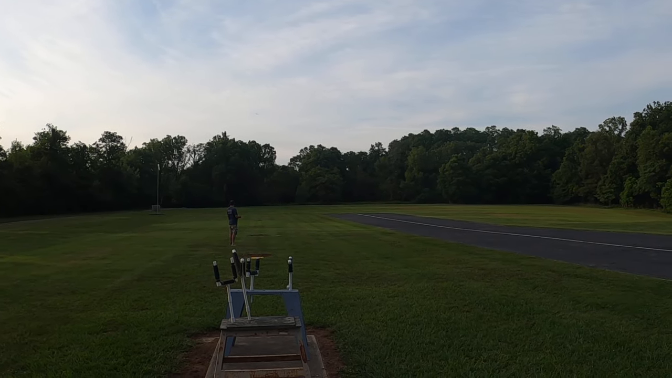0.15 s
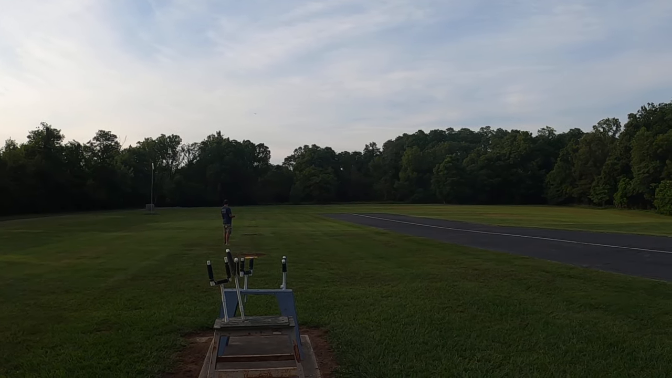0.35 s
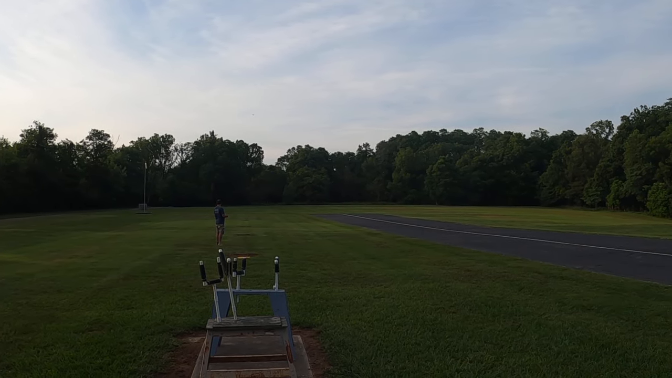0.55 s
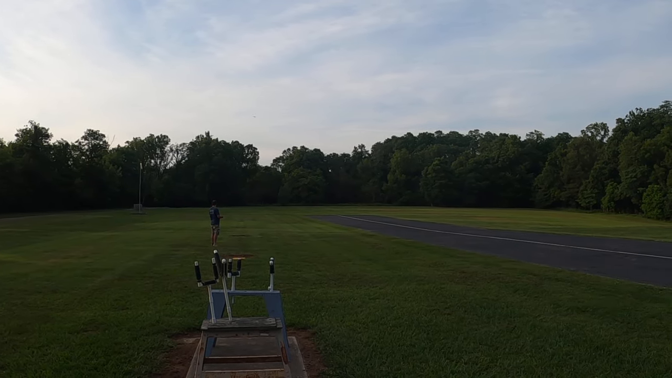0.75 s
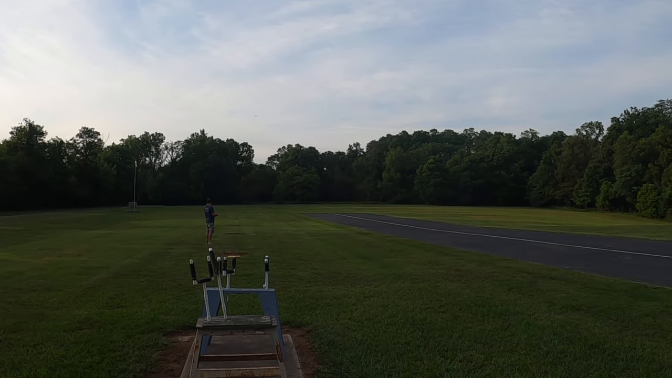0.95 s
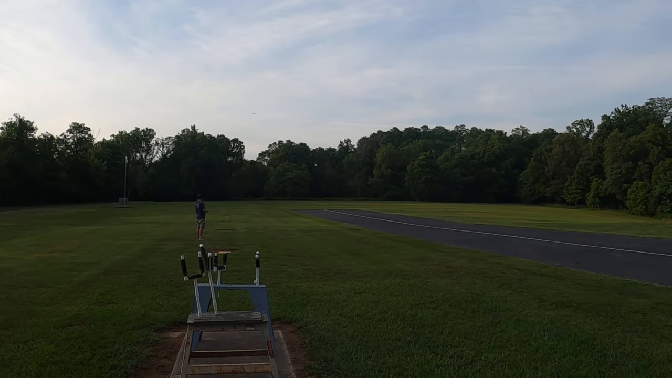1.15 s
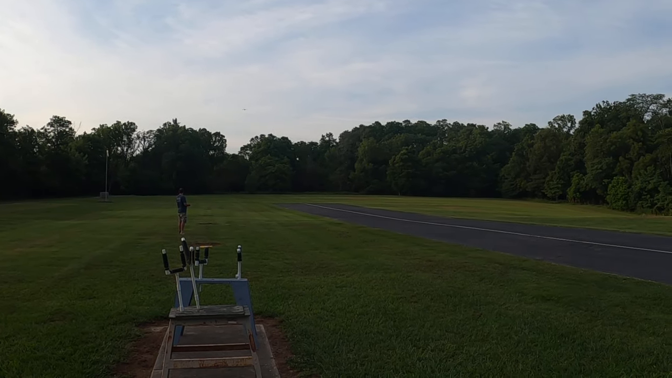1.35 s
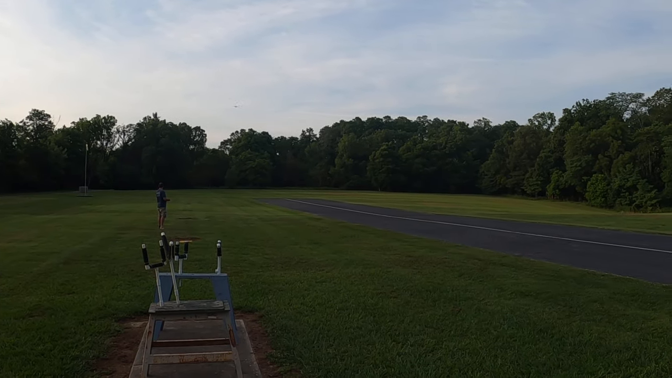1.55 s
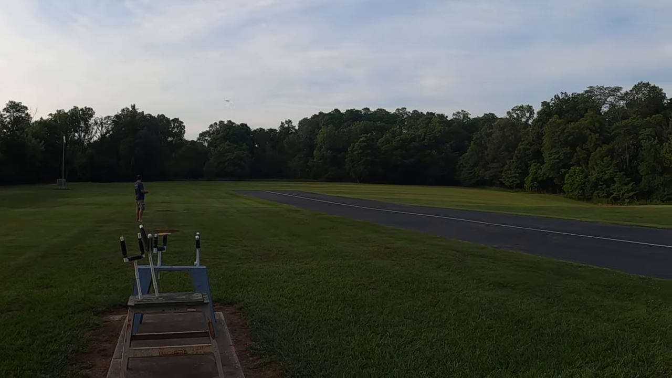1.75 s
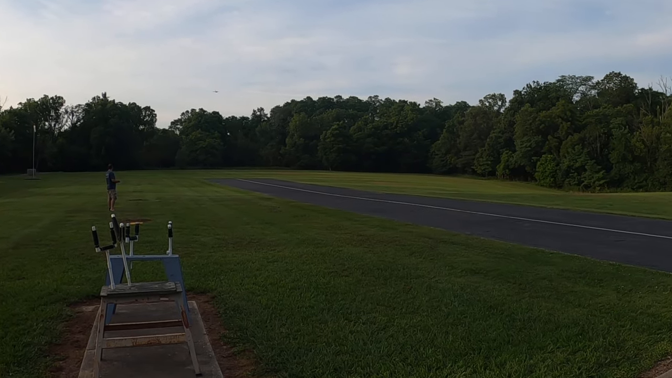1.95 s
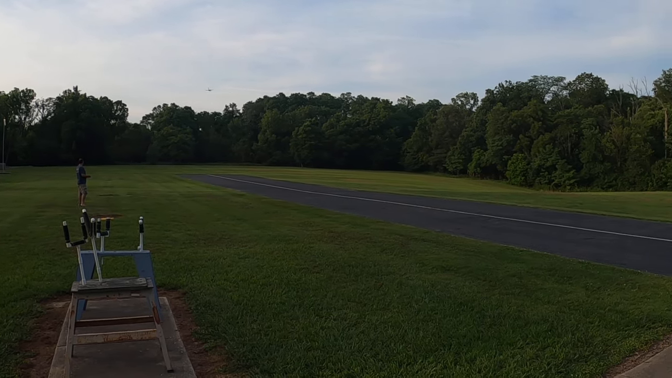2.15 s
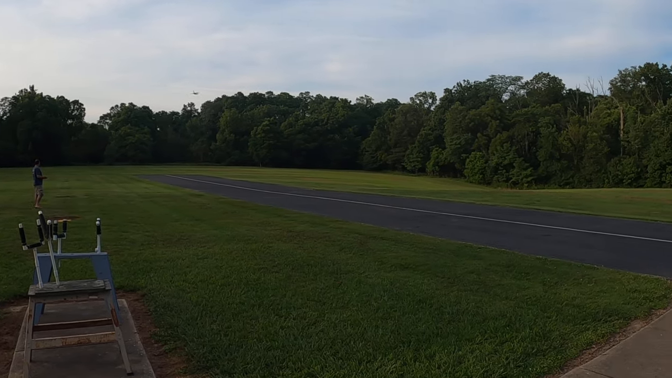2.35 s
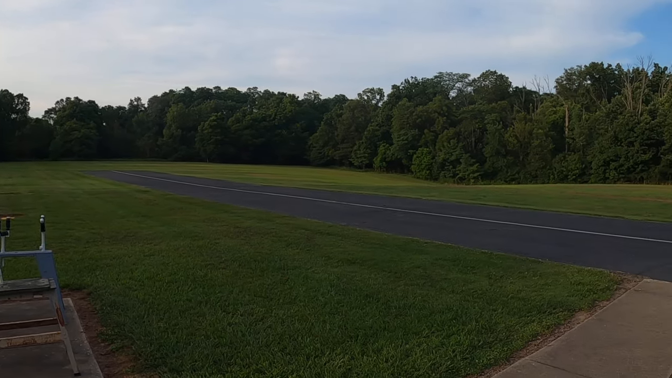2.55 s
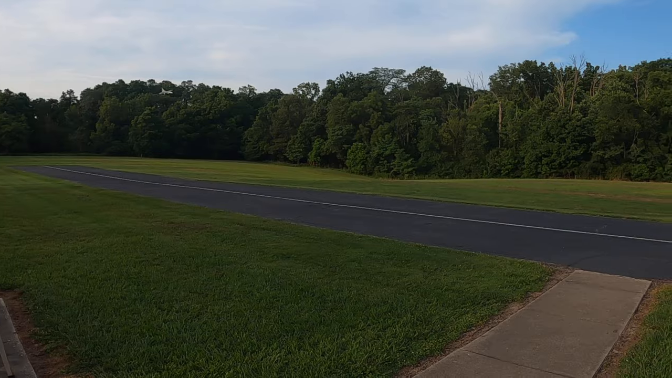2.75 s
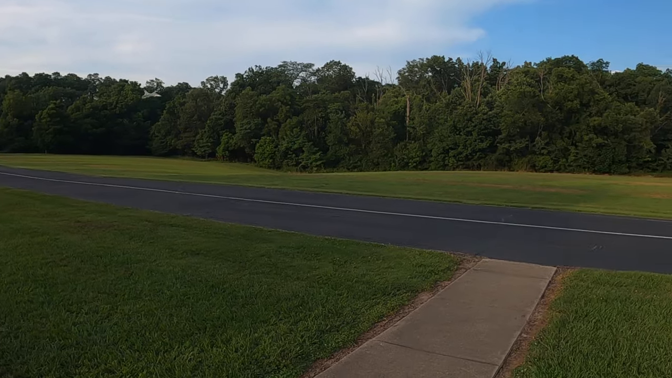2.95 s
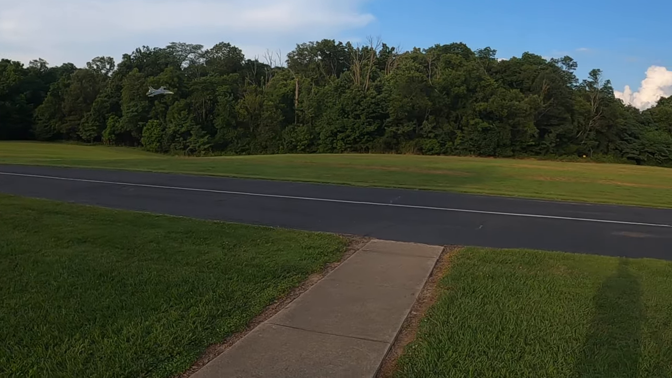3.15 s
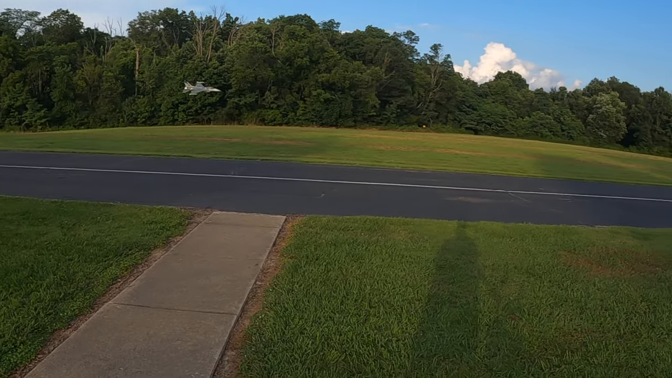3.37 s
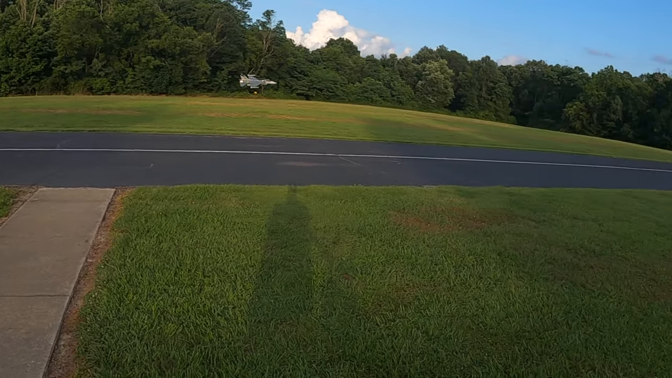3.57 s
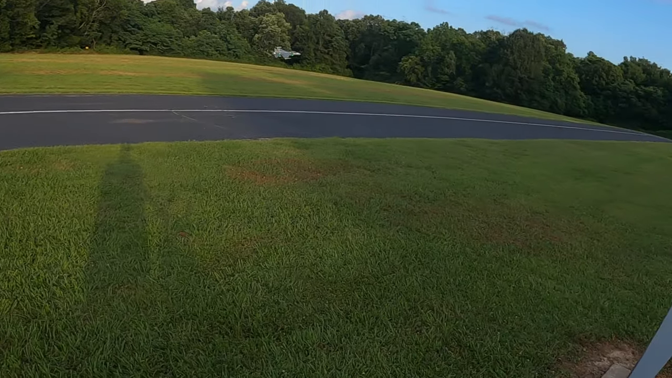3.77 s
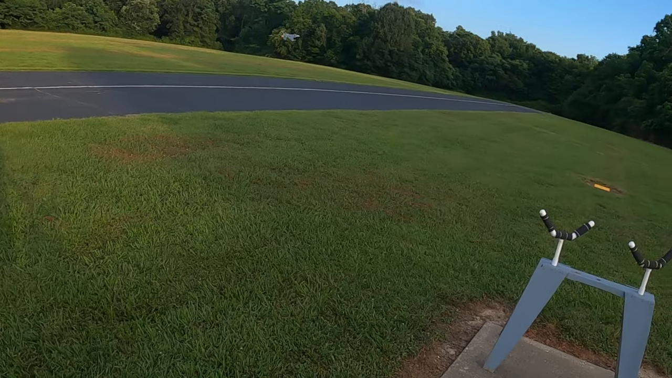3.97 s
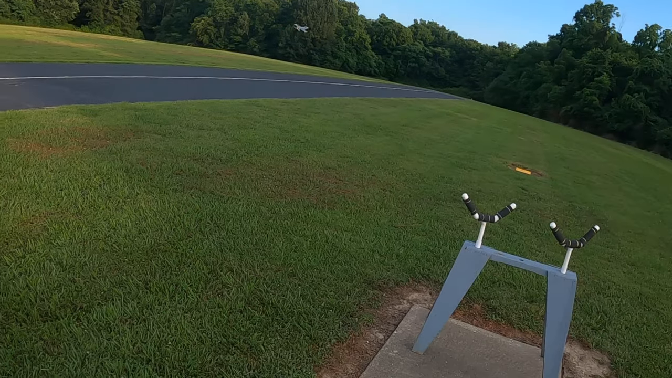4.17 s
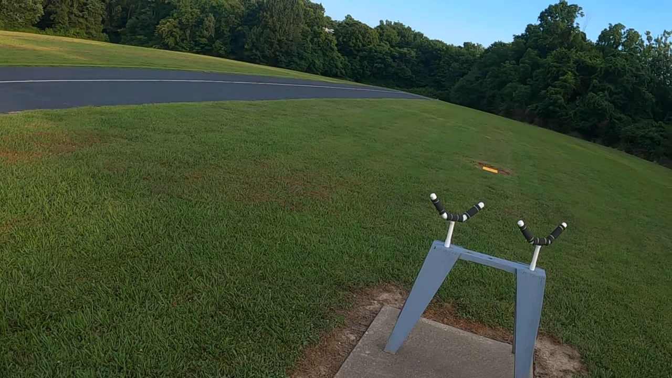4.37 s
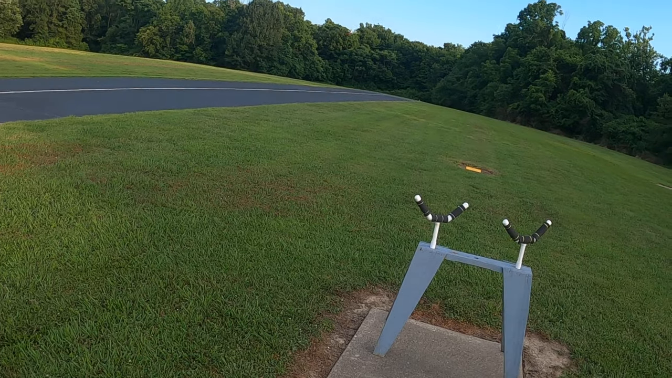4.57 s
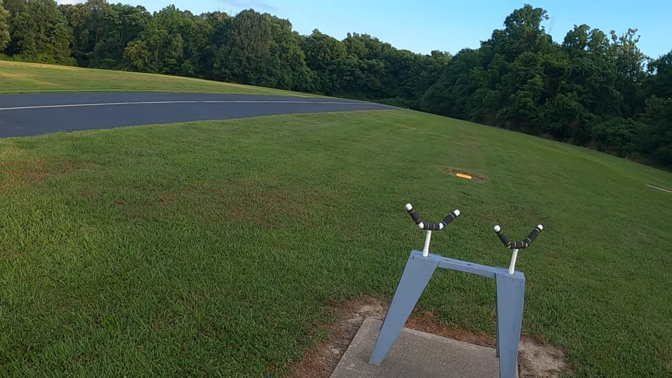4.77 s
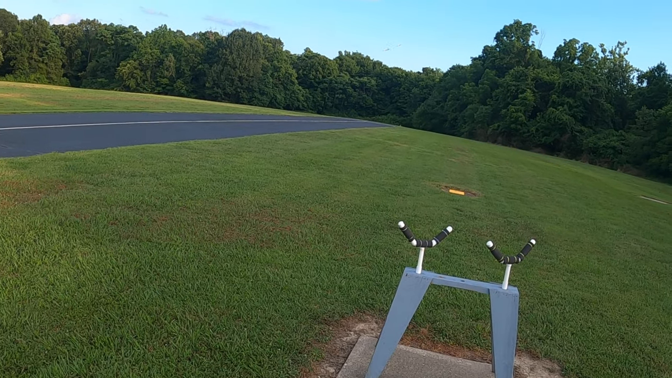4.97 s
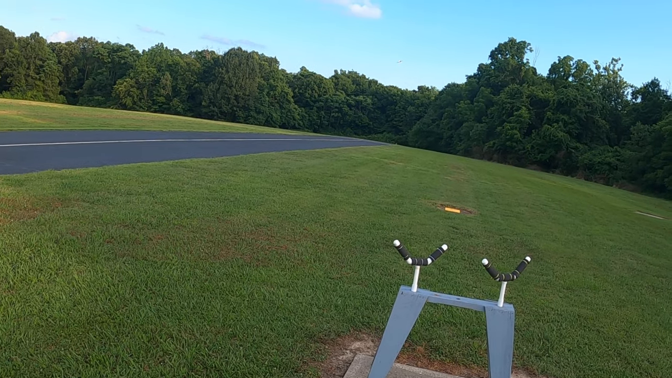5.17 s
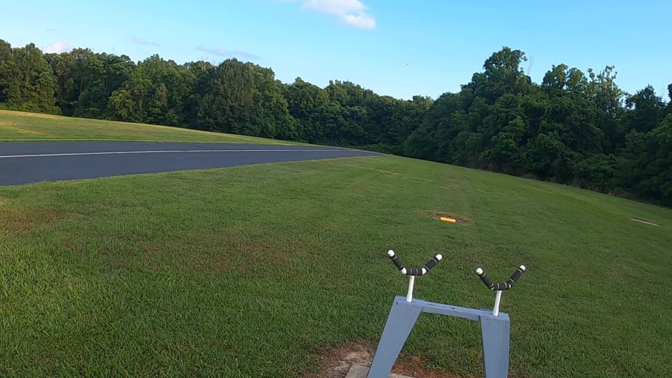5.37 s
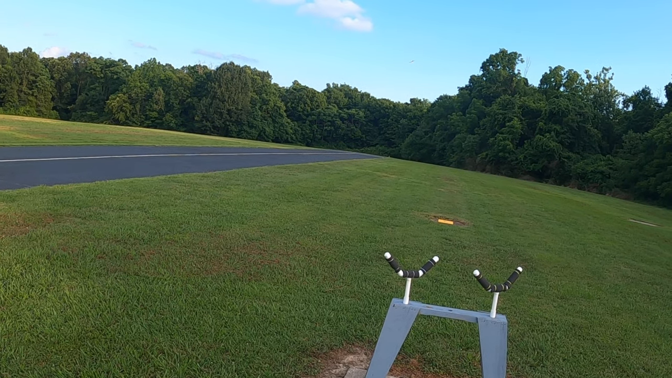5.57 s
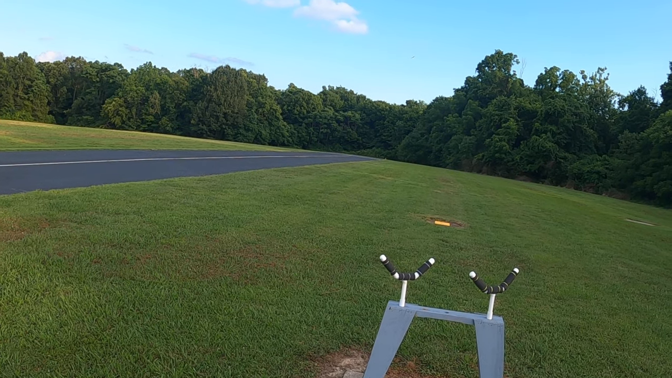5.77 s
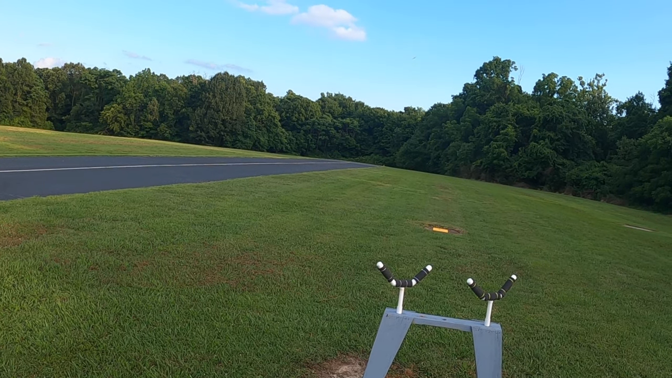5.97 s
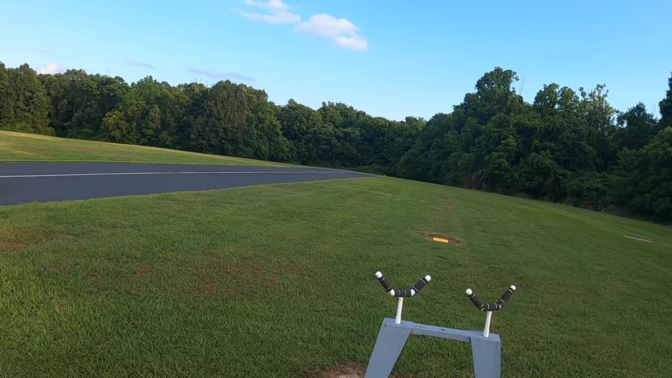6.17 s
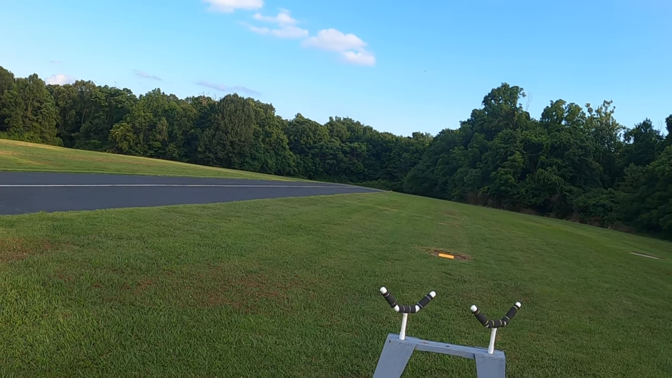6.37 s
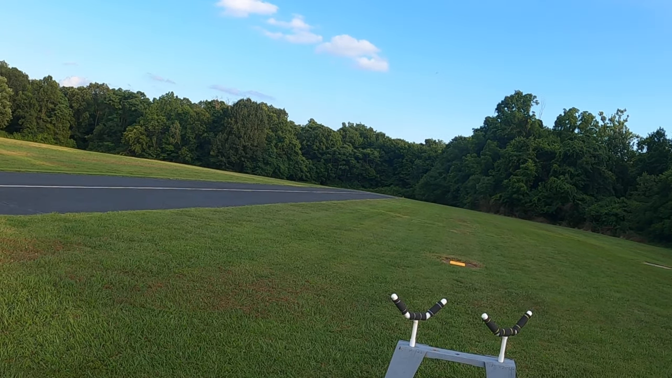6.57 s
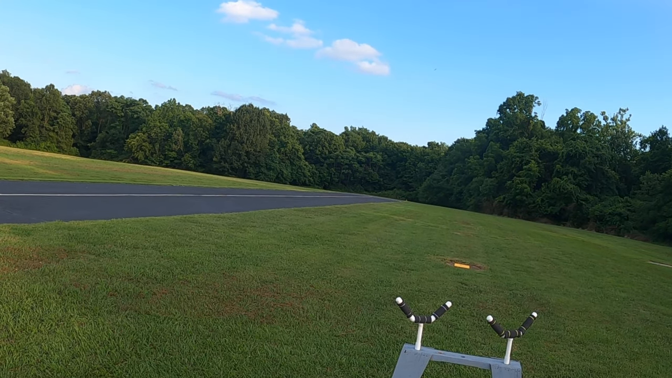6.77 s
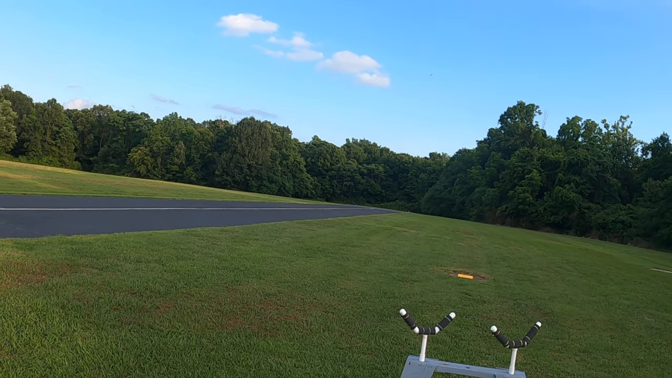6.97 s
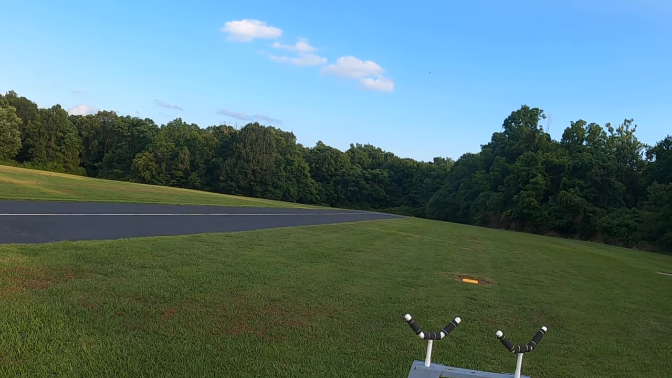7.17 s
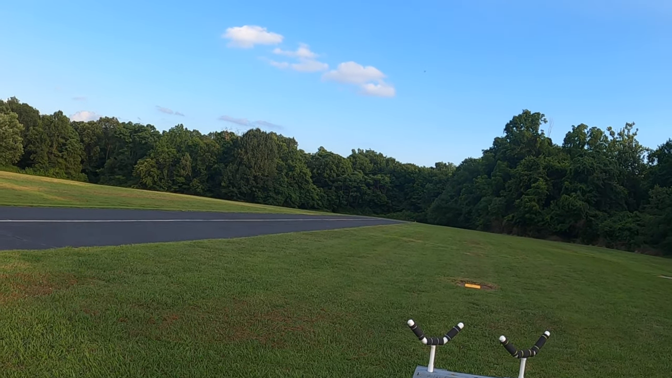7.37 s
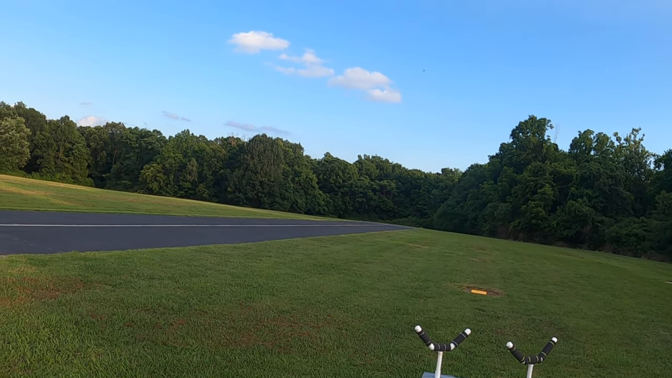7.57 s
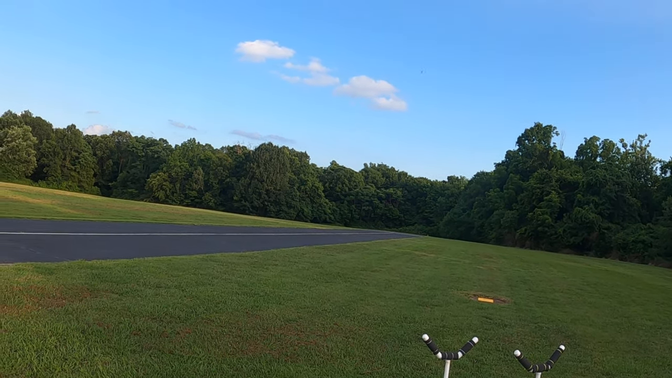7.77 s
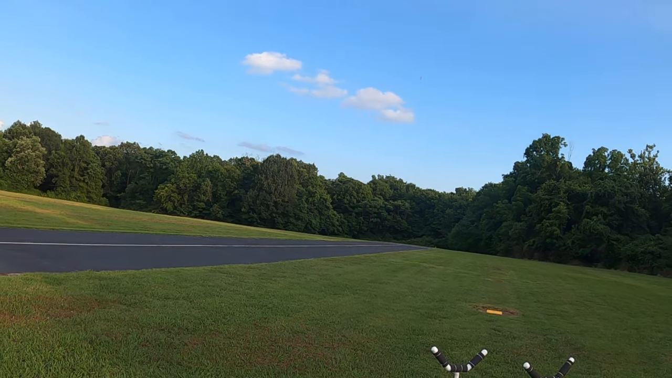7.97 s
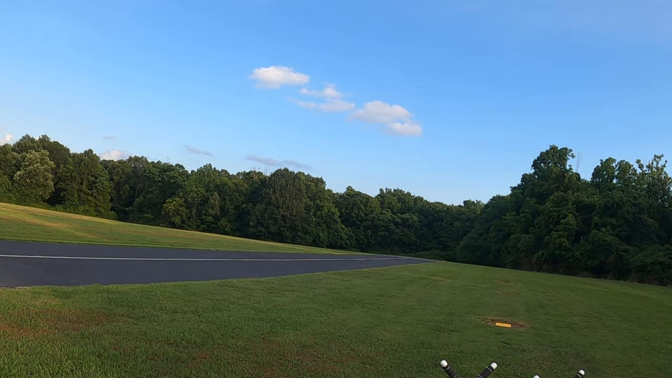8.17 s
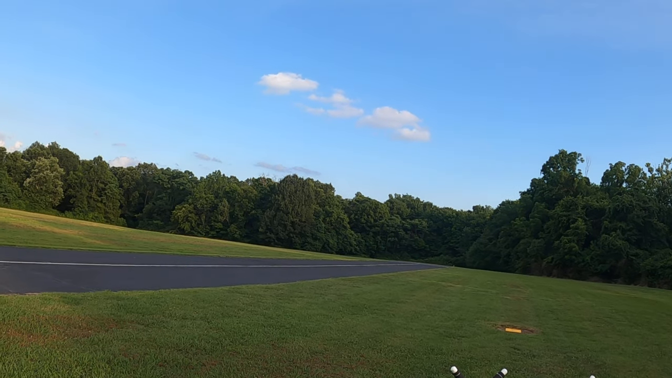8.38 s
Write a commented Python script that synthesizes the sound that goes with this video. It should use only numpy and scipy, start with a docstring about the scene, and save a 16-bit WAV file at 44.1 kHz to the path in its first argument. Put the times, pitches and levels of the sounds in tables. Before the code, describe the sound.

At an open flying field, a small electric jet begins as a distant soft rush over a faint low drone. Its high blade whine emerges and builds for several seconds, peaking brightly as it sweeps past near four seconds. The pitch drops quickly, the tone flickers, and the rush becomes duller and recedes. Low wind rumbles and small thumps buffet a handheld stereo microphone.

```python
"""A model jet with an electric ducted fan spools up, dives past low over the runway of a grass field and climbs away.
Its rush is noise shaped first by the intake, then by the nozzle; echoes off grass and runway draw sliding combs.
The blade whine is a sine that drops in pitch as the jet passes, with shaft tone, hum, overtone and noisy skirt.
A faint hiss and a far drone open the scene; wind rumbles in and buffets both ports of a hand-held camera microphone."""
import sys
import numpy as np
from scipy import signal
from scipy.fft import rfft, irfft, next_fast_len
from scipy.io import wavfile
from scipy.ndimage import map_coordinates

SR = 44100
rng = np.random.default_rng(int(sys.argv[2]) if len(sys.argv) > 2 else 0)


def transcribe(u):
    """Save the signal u as a 16-bit wav file named by the first command-line argument.

    u: samples, shape (n,) or (channels, n), limited to [-1, 1]; the rate is SR.
    q: integer samples, one column per channel.
    """
    v = np.clip(np.atleast_2d(u).T, -1, 1)
    q = np.round(v * 32767).astype(np.int16)
    wavfile.write(sys.argv[1], SR, q)


def volts_from_decibels(level):
    """Turn decibel levels (scalar or array-like) into linear amplitude factors."""
    exponent = np.asarray(level, float) / 20
    return 10 ** exponent


N = 371763

# Straight path that sets distance and angle, and the moment its nearest point is heard.
SPEED_M_PER_S, NEAREST_M, NEAREST_S = 47.6, 20.3, 3.718
MIC_HEIGHT_M, SOUND_M_PER_S = 1.6, 343
# Dive, low pass and climb. Each row: time in seconds, height in metres.
HEIGHT = [(0, 43), (1.44, 26.1), (2.15, 16.65), (2.8, 9.33), (3.175, 5.68), (3.355, 4.14), (3.52, 2.71),
          (3.735, 1.83), (3.83, 1.575), (4.0, 1.58), (4.07, 1.5), (4.2, 1.78), (4.33, 2.4), (4.51, 4.06),
          (4.95, 8.13), (5.4, 13.2), (6, 21.5), (7.4, 45.9), (8.43, 70)]
# Cosine of the angle at which only the intake, only the nozzle is heard.
INTAKE_COS, NOZZLE_COS = -.8, .75
# Blade rate as the fan spools up, before Doppler. Each row: time in seconds, rate in Hz.
FAN_RATE = [(0.12, 4700), (0.3, 4827), (0.56, 5587), (0.66, 5657), (1.0, 5657), (2.6, 5697), (3.5, 5675),
            (8.43, 5681)]

# Hiss before the fan spools up. One row: centre in Hz, level in dB, end in seconds.
EARLY_HISS = (5430, -63, .3)
DRONE_HZ, DRONE_WIDTH_HZ, DRONE_DB, DRONE_ENDS_S = 93.3, 32, -44, 1.18

# Fan rush. Each row: time in seconds, level in dB, treble against level in dB (used about its mean).
RUSH = [(0.0, -51, -22.5), (0.19, -48.5, -24.5), (0.75, -44.5, -21), (1.01, -43, -17), (1.13, -44, -10.5),
        (1.55, -44.5, -19), (1.81, -41, -14.5), (2.04, -43, -13.5), (3.28, -34.5, -6.5), (3.83, -31.5, -9),
        (4.06, -35, -7), (4.81, -37, -12), (5.42, -38.5, -20.5), (6.6, -44.5, -22.5), (6.69, -43, -33),
        (6.78, -44.5, -25.5), (7.25, -43.5, -29.5), (7.39, -46, -22.5), (7.77, -42.5, -27),
        (7.86, -42.5, -18), (8.01, -47.5, -24.5), (8.17, -45.5, -32), (8.43, -46.5, -16.5)]
# Spectrum from the front. Each row: frequency in Hz, relative density in dB.
INTAKE_COLOUR = [(88, -34), (150, -0.5), (234, 4), (337, -2), (578, 1), (757, -0.5), (972, 6), (1350, 3),
                 (2100, 1), (2550, -2.5), (3000, -3.5), (3400, -3.5), (4100, -1.5), (5000, -2.5),
                 (6550, -1.5), (7640, -8), (15000, -59)]
# Spectrum from the rear. Each row: frequency in Hz, relative density in dB.
NOZZLE_COLOUR = [(88, 2), (150, -3), (221, -0.5), (459, -2.5), (687, -4), (1350, 3.5), (2450, -1),
                 (5200, 1.5), (7640, -5.5), (10000, -22), (15000, -46)]
# Narrow bands from intake and nozzle; both stand out more from afar.
INTAKE_HZ, INTAKE_WIDTH_HZ, INTAKE_DB, INTAKE_GAIN_DB_PER_M = 2650, 96, -17.5, 0.0727
NOZZLE_HZ, NOZZLE_WIDTH_HZ, NOZZLE_DB, NOZZLE_GAIN_DB_PER_M = 5205, 245, -7.5, 0.0738
NOZZLE_FOLLOWS_TREBLE = 0.063   # dB per dB, only beyond FAR_M
# Tone controls of the rush: dB per dB, then dB.
BASS_FOLLOWS_LEVEL, PRESENCE_FOLLOWS_TREBLE, PRESENCE_FOLLOWS_LEVEL = 0.048, 0.59, -0.55
BASS_LOSS_REAR_DB, PRESENCE_GAIN_REAR_DB = 1, 0.5
SLOW_FAN_GAIN_DB = 1   # presence gained per share of full speed that the fan lacks
# Beyond this distance the upper bands sink further.
FAR_M, FAR_INTAKE_LOSS_DB_PER_M, FAR_NOZZLE_TOP_LOSS_DB_PER_M = 128, 0.09, .12

# Echo strengths. Each row: time in seconds, ground bounce in dB, second echo in dB.
ECHOES = [(0, -17, -28), (1.5, -20, 1), (3.1, -6, 0.5), (3.4, -13, 3), (3.72, -15, -14), (3.85, -3, -14),
          (4.1, -1.5, -14), (4.4, -10, -14), (4.65, -.5, -30), (5.05, -.5, -30), (5.2, -6, -30),
          (5.5, -5, -35), (8.43, -7, -8)]
# Soft ground. Each row: frequency in Hz, strength of the bounce in dB.
GRASS = [(200, 0), (1500, -1), (4200, -3), (10000, -11)]
# Soft ground. Each row: frequency in Hz, phase turn of the bounce in radians.
GRASS_PHASE = [(200, -0.73), (900, -1.12), (1500, -0.93), (5000, 0.75)]
# Hard ground. Each row: frequency in Hz, strength of the bounce in dB.
RUNWAY = [(500, -8), (1100, -1), (3000, -2), (12000, -4.5)]
# Hard ground. Each row: frequency in Hz, phase turn of the bounce in radians.
RUNWAY_PHASE = [(1000, 1.3), (3000, .5), (4500, 0)]
# Ground below. Each row: time in seconds, share of the bounce off hard runway instead of grass (0 to 1).
OVER_RUNWAY = [(3.72, 0), (3.8, 1), (4.33, 1), (4.45, 0)]
# Second echo. Each row: frequency in Hz, strength in dB.
SECOND_ECHO = [(200, -8), (1500, -16.5), (2500, 4.5), (5000, -84)]
SECOND_MS, SECOND_REAR_MS = 0.43, 0.23   # its lag behind the bounce, and the extra lag once the jet is past
# Dull echo with a low notch that climbs and sinks. Each row: time in seconds, delay in ms, strength in dB.
LOW_ECHO = [(3.15, 2.1, -20), (3.35, 1.6, -3), (3.69, .78, -1), (3.86, 1.02, -12), (4.4, 1.2, -5),
            (4.65, 1.5, -25)]
# Dull echo. Each row: frequency in Hz, strength in dB.
LOW_ECHO_COLOUR = [(1000, 0), (2200, -20)]

# Wind on the ports. Each row: time in seconds, relative level in dB, left minus right in dB.
WIND = [(0.0, -46.5, 1), (0.7, -44, 1), (1.1, -45.5, 5), (1.35, -40, -1), (1.7, -42, 8), (2.05, -33, 2.5),
        (2.4, -45.5, 3), (3.08, -43, -0.5), (3.4, -32.5, 15), (4.1, -51, -9), (4.3, -39, -3),
        (4.75, -58, 14), (5.45, -39.5, -5), (5.54, -30, -11), (5.75, -49.5, 17), (6.13, -31, -2),
        (6.29, -56, -4), (6.48, -40.5, 8), (7.23, -39.5, 1), (8.19, -45, -2), (8.43, -56, -9)]
# Wind rumble. Each row: frequency in Hz, relative density in dB.
WIND_COLOUR = [(18, -7), (40, 3), (90, -3.5), (140, -14.5), (250, -35.5), (500, -77)]
# Single buffets. Each row: start in seconds, strength in dB, left minus right in dB.
BUFFETS = [(1.266, -29.5, 5), (3.263, -20.5, 9), (3.427, -20, 15), (5.512, -26.5, -17), (5.957, -27, -22),
           (6.077, -24.5, 30), (6.084, -27, -27), (6.095, -24, -25), (7.076, -29, -29), (7.679, -31.5, 16)]

# Blade tone, its dips after the pass included. Each row: time in seconds, level in dB.
BLADE = [(0.25, -74), (0.33, -59), (0.7, -54), (1.3, -43), (1.5, -56), (2.0, -40), (2.6, -40), (3.1, -32),
         (3.4, -29), (3.7, -25), (4.03, -27), (4.09, -46), (4.16, -31), (4.27, -28), (4.33, -40),
         (4.4, -34), (4.5, -39), (4.6, -30), (4.72, -41), (5.1, -37), (5.55, -42), (5.8, -51), (6.1, -53),
         (7.0, -65)]
# Ground bounce of the blade tone, strong only from 2.7 s to 3.95 s. Each row: time in seconds, strength in dB.
TONE_BOUNCE = [(2.3, -12), (2.7, -1.5), (3.95, -1.5), (4.05, -16)]
TONE_FLICKER_DB_PER_M, TONE_TURN_RAD = .02, 1.95   # eddies make the tone flicker; the ground turns its bounce
SKIRT_DB, SKIRT_LOSS_DB_PER_M = 6.5, .24   # skirt against blade tone, sinking with distance
BLADES, HUM_RATIO = 11, .6   # hum pitch is this share of the shaft rate
# Shaft tone. One row: peak in seconds, peak level in dB, rise in dB/s, fall in dB/s.
SHAFT = (3.27, -38, 18, 70)
# Low hum. One row: peak in seconds, peak level in dB, rise in dB/s, fall in dB/s.
HUM = (3.65, -38, 14, 24)
# Overtone an octave up. One row: peak in seconds, peak level in dB, rise in dB/s, fall in dB/s.
OVERTONE = (4.25, -49.5, 6, 28)

# Where the jet is across the ports. Each row: time in seconds, left minus right in dB.
BEARING = [(0.0, 6.5), (3.2, 7), (4.2, 5), (8.43, 3)]
# Port difference. Each row: frequency in Hz, left minus right in dB.
PORT_TILT = [(200, -5.5), (6000, -3), (9000, -10), (14000, -19.5)]
# Port difference. Each row: frequency in Hz, lead of the left port in radians.
PORT_PHASE = [(200, -0.23), (1200, -0.6), (3500, -0.86), (6200, -1.1), (7600, -2.5), (8500, -1.3),
              (12000, -0.95)]
# Scattered sound. Each row: frequency in Hz, unrelated share in each port in dB.
SCATTER = [(200, -20), (1500, -17), (5000, -14), (12000, -6)]
# Microphone response. Each row: frequency in Hz, gain in dB.
MIC_COLOUR = [(3000, 0), (3700, 1.5), (4600, -1.5), (5200, -1), (6300, -0.5), (7050, 1.5), (7500, -6),
              (8300, -1.5)]


def rms_one(x):
    """Scale to an rms of 1."""
    return x / np.sqrt(np.mean(x ** 2) + 1e-20)


def in_time(rows):
    """Draw each column as a line over the whole scene."""
    s, *columns = np.transpose(rows)
    return [np.interp(np.arange(N) / SR, s, c) for c in columns]


def at_hz(points, hz):
    """Read a curve along log frequency."""
    return np.interp(np.log(hz), np.log(np.array(points)[:, 0]), np.array(points)[:, 1])


def drift(rate_hz):
    """Slow chance with spread 1: noise at every 40th sample through a double one-pole low-pass."""
    r = np.exp(-80 * np.pi * rate_hz / SR)
    noise = rng.standard_normal(N // 40 + 2002)
    slow = signal.lfilter([1], [1, -2 * r, r * r], noise)[2000:]   # skip the settling filter
    return np.interp(np.arange(N) / 40, np.arange(len(slow)), rms_one(slow))


def coloured(x, points, phase=((1, 0), (2, 0))):
    """Shape by a spectrum in dB and turn the phase in radians."""
    size = next_fast_len(N)
    hz = np.maximum(np.arange(size // 2 + 1) * SR / size, 1)
    response = volts_from_decibels(at_hz(points, hz)) * np.exp(1j * at_hz(phase, hz))
    return irfft(rfft(x, size) * response, size)[..., :N]


def delayed(x, samples):
    """Delay by a moving, fractional number of samples."""
    return map_coordinates(x, [np.arange(N) - samples], order=3, mode="mirror")


def narrow(x, hz, width_hz):
    """One broad resonance."""
    edges = [hz - width_hz / 2, hz + width_hz / 2]
    return signal.sosfilt(signal.butter(1, edges, "band", fs=SR, output="sos"), x)


def swell(peak_s, peak_db, rise, fall):
    """Level in dB that climbs to a peak and sinks again."""
    late = np.arange(N) / SR - peak_s
    return peak_db + np.minimum(rise * late, -fall * late)


def flight():
    """Distance and cosine of the angle behind the jet, as they were when the sound now heard left it."""
    along = SPEED_M_PER_S * (np.arange(-SR, N + SR, 40) / SR - NEAREST_S)
    metres = np.hypot(along, NEAREST_M)
    heard = NEAREST_S + along / SPEED_M_PER_S + (metres - NEAREST_M) / SOUND_M_PER_S
    return in_time(np.transpose([heard, metres, along / metres]))


def facing():
    """0 while the intake faces the microphone, 1 once the nozzle does."""
    return np.clip((flight()[1] - INTAKE_COS) / (NOZZLE_COS - INTAKE_COS), 0, 1)


def early_hiss():
    """A sine with randomly drifting quadratures makes a narrow hiss that stops as the fan spools up."""
    t, (hz, db, end_s) = np.arange(N) / SR, EARLY_HISS
    turn = 2 * np.pi * hz * t
    hiss = drift(70.0) * np.sin(turn) + drift(70.0) * np.cos(turn)
    return volts_from_decibels(db) * hiss * np.clip((end_s - t) / .05, 0, 1)


def far_drone():
    """Noise through two equal low resonances makes a far drone that fades."""
    once = narrow(rng.standard_normal(N), DRONE_HZ, DRONE_WIDTH_HZ)
    drone = volts_from_decibels(DRONE_DB) * rms_one(narrow(once, DRONE_HZ, DRONE_WIDTH_HZ))
    return drone * np.clip((DRONE_ENDS_S - np.arange(N) / SR) / .15, 0, 1)


def rush(channels):
    """Broad fan noise, from intake then nozzle; eddies on the path make the upper bands swell."""
    (level_db, treble_db), rear, metres = in_time(RUSH), facing(), flight()[0]
    far_m = np.maximum(metres - FAR_M, 0)
    fan_hz = in_time(FAN_RATE)[0]
    louder_db, treble_db = level_db - level_db.mean(), treble_db - treble_db.mean()

    bass_db = BASS_FOLLOWS_LEVEL * louder_db - BASS_LOSS_REAR_DB * (rear - .5)
    presence_db = PRESENCE_FOLLOWS_TREBLE * treble_db + PRESENCE_FOLLOWS_LEVEL * louder_db
    presence_db += PRESENCE_GAIN_REAR_DB * rear
    presence_db += SLOW_FAN_GAIN_DB * (1 - fan_hz / fan_hz.max())
    presence_db -= FAR_INTAKE_LOSS_DB_PER_M * far_m * (1 - rear)
    top_db = 1.62 * treble_db - FAR_NOZZLE_TOP_LOSS_DB_PER_M * far_m * rear

    white = rng.standard_normal((channels, N))
    intake_band_db = INTAKE_DB + INTAKE_GAIN_DB_PER_M * metres
    intake = coloured(white, INTAKE_COLOUR)
    intake += volts_from_decibels(intake_band_db) * narrow(white, INTAKE_HZ, INTAKE_WIDTH_HZ)
    nozzle_band_db = NOZZLE_DB + NOZZLE_GAIN_DB_PER_M * metres
    nozzle_band_db += NOZZLE_FOLLOWS_TREBLE * (treble_db - treble_db.max()) * (metres > FAR_M)
    nozzle = coloured(white, NOZZLE_COLOUR)
    nozzle += volts_from_decibels(nozzle_band_db) * narrow(white, NOZZLE_HZ, NOZZLE_WIDTH_HZ)
    noise = (1 - rear) * intake + rear * nozzle

    # overlapping bands, each with its own moving level
    size = next_fast_len(N)
    spectrum, octave = rfft(noise, size), np.log2(np.arange(size // 2 + 1) * SR / size + 1)
    centres = np.log2([500, 1000, 2200, 3500, 5300, 8300, 13000])   # Hz
    tilts_db = [bass_db, 0, 0, presence_db, (presence_db + treble_db) / 2, treble_db, top_db]
    shared, out = drift(9.1), 0
    for k, tilt_db in enumerate(tilts_db):
        crossfade = np.interp(octave, centres, np.arange(len(centres)) == k)
        band = irfft(spectrum * crossfade, size)[:, :N]
        eddies_db = .17 * (k + 1) * (shared + .8 * drift(9.0))
        out = out + band * volts_from_decibels(tilt_db + eddies_db)
    middle_filter = signal.butter(4, [900, 2500], "band", fs=SR, output="sos")
    middle = signal.sosfilt(middle_filter, noise[0])   # the level refers to this band
    return out * volts_from_decibels(level_db) / middle.std()


def ground_lag_ms():
    """Extra travel time of the ground bounce; eddies shake it and blur the upper comb."""
    mirror_m = 2 * MIC_HEIGHT_M * in_time(HEIGHT)[0] / flight()[0]
    return 1000 * mirror_m / SOUND_M_PER_S + .013 * drift(8.0)


def echoes(straight, lag_ms):
    """Three late copies of the rush, from ground bounce, second echo and dull low echo, comb its spectrum."""
    ground_db, second_db = in_time(ECHOES)
    runway = in_time(OVER_RUNWAY)[0]
    mirrored = (1 - runway) * coloured(straight, GRASS, GRASS_PHASE)
    mirrored += runway * coloured(straight, RUNWAY, RUNWAY_PHASE)
    bounce = volts_from_decibels(ground_db) * delayed(mirrored, lag_ms * SR / 1000)
    second_ms = lag_ms + SECOND_MS + SECOND_REAR_MS * facing()
    second = volts_from_decibels(second_db) * delayed(coloured(straight, SECOND_ECHO), second_ms * SR / 1000)
    low_ms, low_db = in_time(LOW_ECHO)
    low = volts_from_decibels(low_db) * delayed(coloured(straight, LOW_ECHO_COLOUR), low_ms * SR / 1000)
    return bounce + second + low


def wind():
    """Lumpy low rumble, its own in each port."""
    level_db, pan_db = in_time(WIND)
    lumps = volts_from_decibels([3.2 * drift(8.0), 3.2 * drift(8.0)])
    own = coloured(rng.standard_normal((2, N)) * lumps, WIND_COLOUR)
    side_gain = volts_from_decibels(np.array([pan_db, -pan_db]) / 2)
    side_gain *= 2 / np.sqrt(np.sum(side_gain ** 2, axis=0))   # panning keeps the summed power
    return volts_from_decibels(level_db) * side_gain * rms_one(own)


def whine(lag_ms):
    """Doppler-shifted blade tone with a ground bounce near the pass; overtone, noisy skirt, shaft tone and hum."""
    (metres, behind), (steady_db,), rear = flight(), in_time(BLADE), facing()
    hz = in_time(FAN_RATE)[0] / (1 + behind * SPEED_M_PER_S / SOUND_M_PER_S)
    turn = 2 * np.pi * np.cumsum(hz + 4.17 * drift(20.2)) / SR   # the pitch wavers by a few Hz
    bounce_turn = TONE_TURN_RAD - 2 * np.pi * hz * lag_ms / 1000
    both_paths = 1 + volts_from_decibels(in_time(TONE_BOUNCE)[0]) * np.exp(1j * bounce_turn)

    flicker_db = TONE_FLICKER_DB_PER_M * metres * drift(5.2)
    blade = volts_from_decibels(steady_db + flicker_db) * np.imag(both_paths * np.exp(1j * turn))
    skirt_noise = drift(280.0) * np.sin(turn) + drift(280.0) * np.cos(turn)
    skirt_gain = volts_from_decibels(steady_db + SKIRT_DB - SKIRT_LOSS_DB_PER_M * metres) * (.15 + rear ** 2)
    skirt = abs(both_paths) * skirt_gain * skirt_noise
    overtone = rear ** .5 * volts_from_decibels(swell(*OVERTONE) + 2 * drift(24.0)) * np.sin(2 * turn)

    shaft = volts_from_decibels(swell(*SHAFT) + 2 * drift(2.7)) * np.sin(turn / BLADES)
    hum_turn = HUM_RATIO * turn / BLADES
    hum = volts_from_decibels(swell(*HUM)) * (drift(21.0) * np.sin(hum_turn) + drift(59.0) * np.cos(hum_turn))
    return np.sqrt(2) * (blade + shaft) + skirt + overtone + hum


def buffets():
    """Each eddy that hits a port snaps the membrane over and lets it swing out: a short rising chirp."""
    out, t = np.zeros((2, N)), np.arange(SR // 10) / SR
    for (s, strength_db, pan_db), chance in zip(BUFFETS, rng.random(len(BUFFETS))):
        start_hz = 45 + 30 * chance
        envelope = np.exp(-((t - .02) / 0.0037) ** 2)
        swing = np.sin(2 * np.pi * start_hz * (t + 10.2 * t ** 2)) * envelope
        at = int(s * SR)
        port_db = strength_db + 4 + np.array([[pan_db], [-pan_db]]) / 2 - abs(pan_db) / 4
        out[:, at:at + len(t)] += volts_from_decibels(port_db) * swing
    return out


def scene():
    """The jet reaches both ports straight and by three echoes; a scattered part differs between them."""
    straight, *scattered = rush(channels=3)
    lag_ms = ground_lag_ms()
    jet = straight + echoes(straight, lag_ms) + whine(lag_ms) + early_hiss() + far_drone()
    jet = jet + coloured(np.array(scattered), SCATTER)   # now one channel per port
    half_tilt = np.array(PORT_TILT) * [1, .5]
    left = coloured(jet[0], half_tilt, PORT_PHASE)
    right = coloured(jet[1], half_tilt * [1, -1])
    pan_db = in_time(BEARING)[0]
    panned = np.array([left, right]) * volts_from_decibels(np.array([pan_db, -pan_db]) / 2)
    return panned + wind() + buffets()


def low_pass(x):
    """Removes everything above the highest recorded frequency."""
    return signal.sosfilt(signal.butter(12, 15600, fs=SR, output="sos"), x)


def record(dry):
    """The microphone colours the sound and rolls off at the top."""
    roll_off = signal.butter(8, 14500, fs=SR, output="sos")
    mix = signal.sosfilt(roll_off, coloured(dry, MIC_COLOUR))
    return low_pass(mix)


dry = scene()
out = record(dry)
transcribe(out)
```